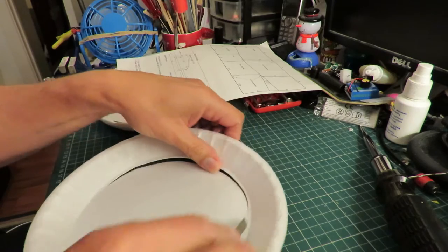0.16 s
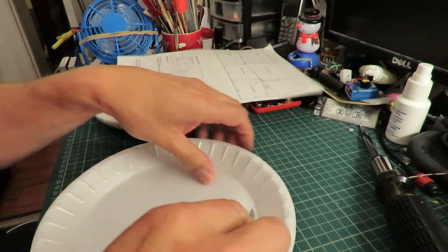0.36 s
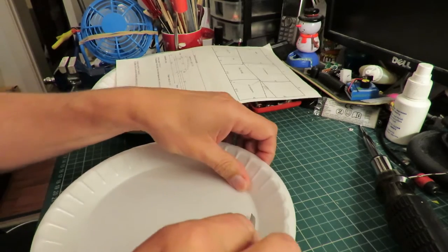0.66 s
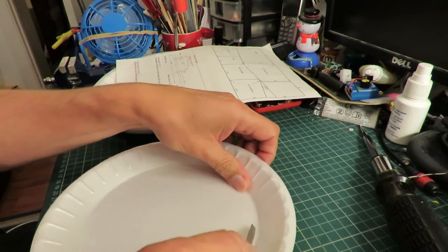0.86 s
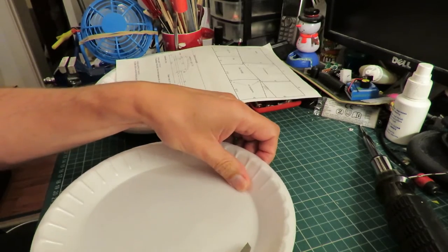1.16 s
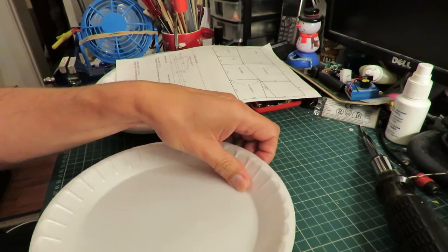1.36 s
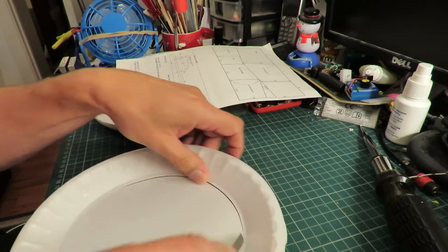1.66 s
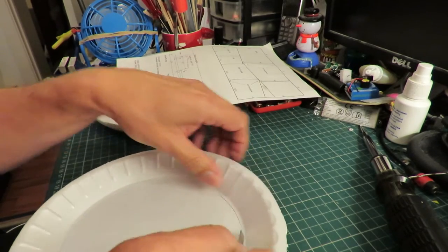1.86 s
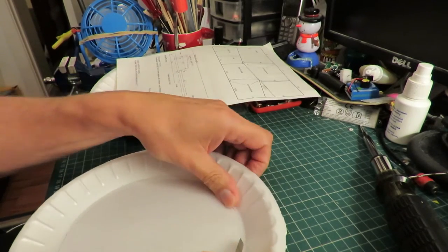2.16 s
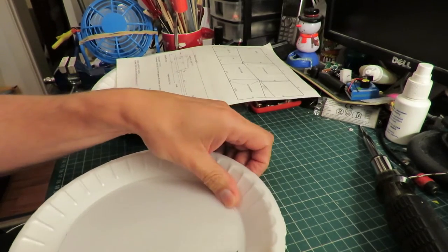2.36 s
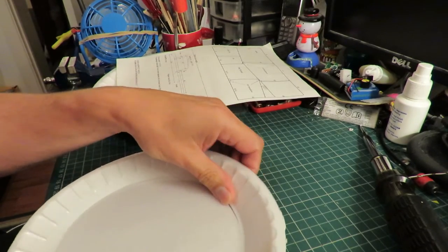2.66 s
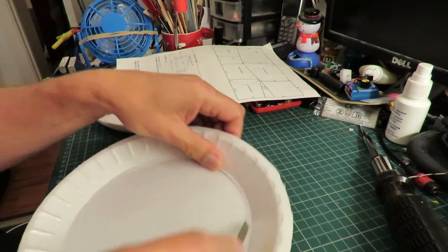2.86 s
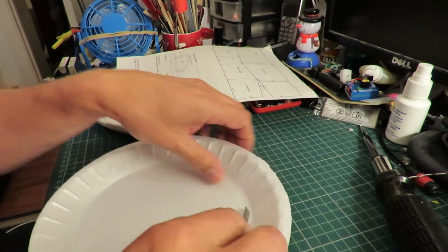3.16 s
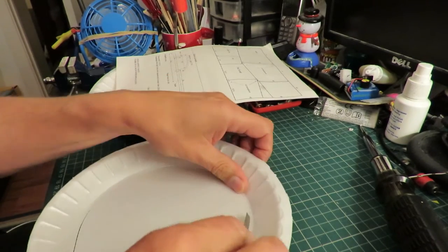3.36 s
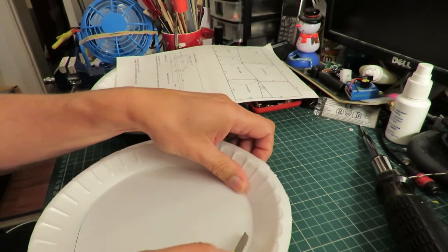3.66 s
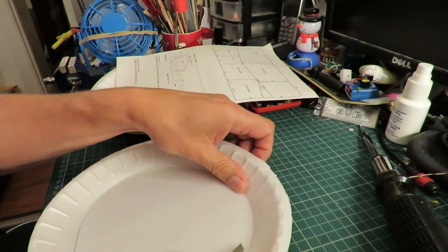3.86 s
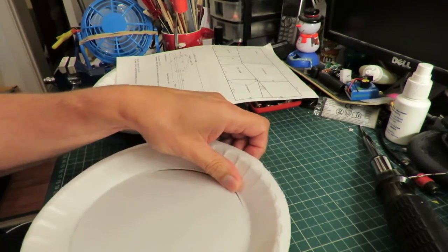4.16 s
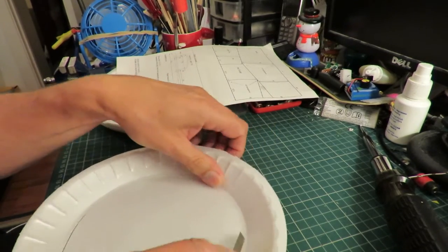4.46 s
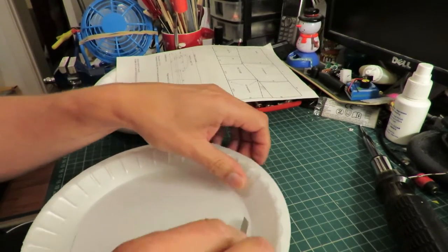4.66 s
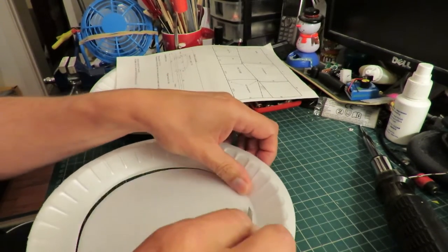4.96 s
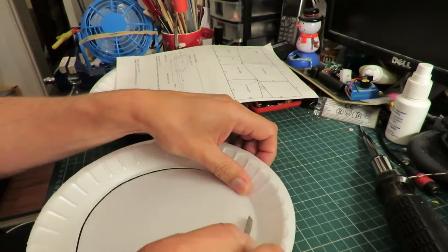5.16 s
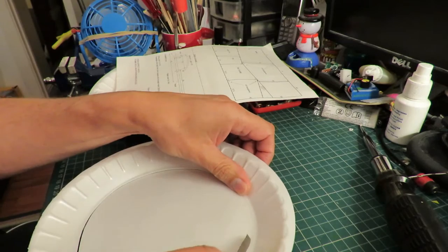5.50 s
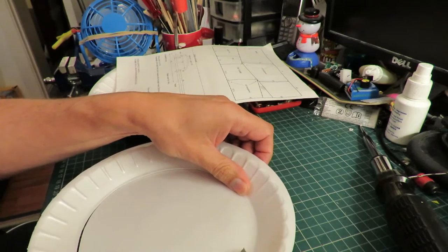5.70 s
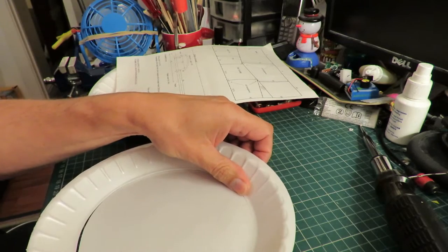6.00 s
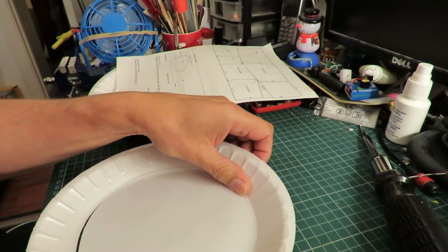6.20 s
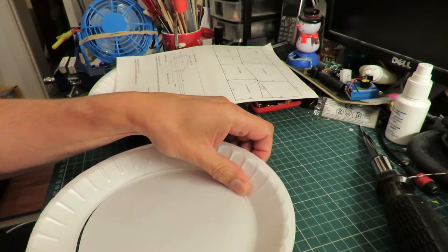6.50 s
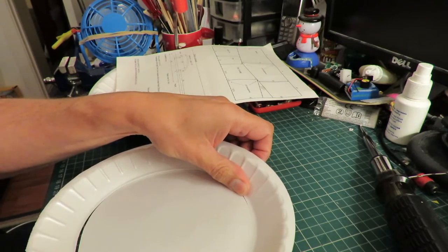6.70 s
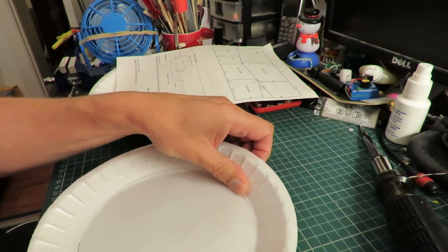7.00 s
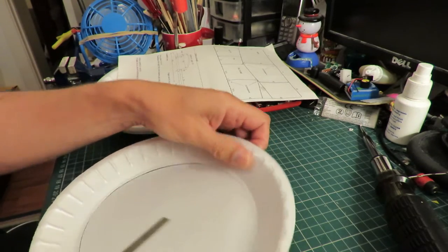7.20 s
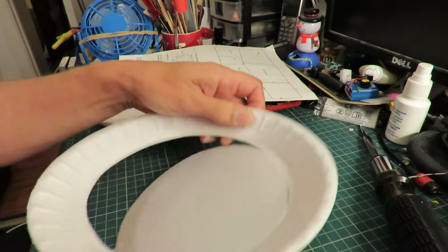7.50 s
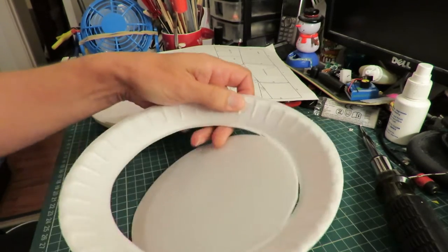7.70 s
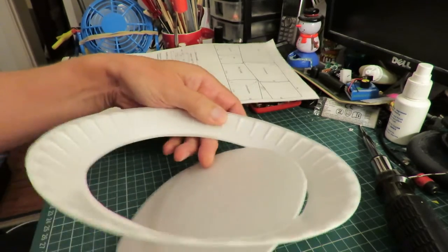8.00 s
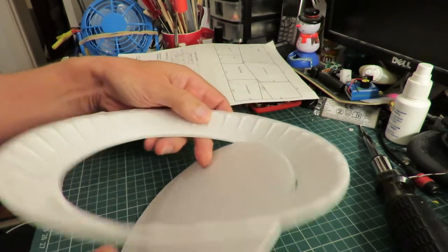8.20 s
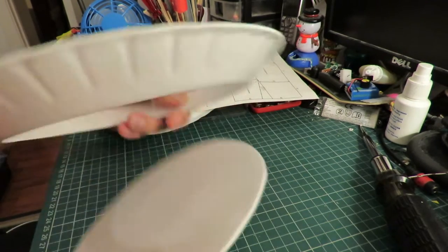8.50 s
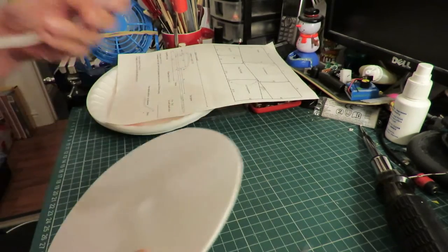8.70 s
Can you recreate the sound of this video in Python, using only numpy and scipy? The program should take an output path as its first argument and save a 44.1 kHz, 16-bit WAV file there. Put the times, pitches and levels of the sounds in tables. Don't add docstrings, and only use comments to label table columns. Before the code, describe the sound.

In a small, quiet, nearly dry room, close to the microphone, a foam plate snaps twice and rubs on a desk mat during the first 0.5 s. A knife bites briefly, then scrapes slowly with fine fizzing crackle until 1.5 s, swelling at the end. A hard snap at 1.66 is followed by loose rubbing. A stronger, uneven stroke runs 2.05-2.7, then knocks and dull desk bumps as the plate is shifted. A faint, wavering stroke from 3.3 ends near 4.25 with the loudest, very short pop. After a lull with soft rubs, a light scrape at 4.8 leads into a long grainy cut from 5.05 to 6.9, swelling around 6.3-6.7. Clustered knocks and a low thump follow to 7.1. Quieter creaks and rubs, a knock at 7.77, scattered dry ticks around 8, and a bright clack at 8.55 close it, leaving near silence.

```python
import sys
import numpy as np
from scipy import signal
from scipy.fft import rfft, irfft, next_fast_len
from scipy.io import wavfile
from scipy.ndimage import uniform_filter1d

SR = 44100
rng = np.random.default_rng(int(sys.argv[2]) if len(sys.argv) > 2 else 0)


def generate_wav(signal):
    frames = np.transpose(np.atleast_2d(signal))
    scaled = np.clip(frames, -1, 1) * 32767
    pcm = np.round(scaled).astype(np.int16)
    wavfile.write(sys.argv[1], SR, pcm)


def level_to_linear(level):
    exponent = np.asarray(level, float) / 20
    return 10 ** exponent


N = 390285

# (frequency [Hz], level [dB])
FOAM_BODY = [(290, -51), (500, -11.5), (736, -20), (874, 1), (1590, 4), (2200, -1), (2810, -1),
             (3100, -0.5), (3760, -11), (6500, -11.5), (8450, -19), (14300, -120)]
# (frequency [Hz], level [dB])
CELL_FIZZ = [(500, -56.5), (2350, 0), (4000, -0.5), (4940, -6), (5770, -7), (6500, -14.5), (9920, -8),
             (12400, -12.5), (14200, -18), (15700, -20)]
# (frequency [Hz], level [dB])
DESK_MODES = [(15, -104), (60, -8), (112, -13), (143, -4), (183, -11.5), (269, -0.5), (312, -4.5),
              (406, -2), (507, -6), (661, -8.5), (744, -13), (850, -2.5), (1100, -4), (1870, -120)]
# (time [s], blade drag [dB], fizz of torn cells over drag [dB])
STROKES = [
    [(0.556, -33, -17), (0.585, -29.5, -11.5), (0.624, -34, -12)],
    [(0.645, -41.5, -4), (0.814, -39, -6.5), (0.866, -40.5, -8), (0.96, -34, -4), (1.122, -37, -6.5),
     (1.46, -30.5, -7), (1.52, -45, -10)],
    [(2.052, -29, -15.5), (2.142, -31, -8), (2.194, -38, -11.5), (2.298, -33.5, -8), (2.332, -38, -11.5),
     (2.612, -29, -7.5), (2.694, -38.5, -8), (2.73, -40, -22)],
    [(3.333, -30, -17), (3.431, -37.5, -11.5), (3.465, -33.5, -8.5), (3.595, -43, -8), (3.825, -43, -8),
     (3.917, -36.5, -6.5), (4.067, -43, -4), (4.159, -39.5, -4.5), (4.25, -37, -17)],
    [(4.796, -46, -16), (4.93, -44, -11), (5.01, -47.5, -13), (5.052, -44, -12)],
    [(5.052, -41, -13.5), (5.256, -33, -11), (5.306, -40, -10.5), (5.432, -36.5, -8), (5.614, -40.5, -4),
     (5.66, -36, -7), (6.15, -36.5, -11.5), (6.3, -32.5, -14.5), (6.89, -39, -19)],
]
# (time [s], peak [dB], frequency [Hz], decay t60 [s])
DESK_PUSHES = [(8.549, -41, 148, 0.18), (2.872, -39.5, 800, 0.073), (3.132, -40.5, 304, 0.047),
               (7.9, -40, 200, 0.035), (8.165, -33.5, 497, 0.047), (0.08, -38.5, 419, 0.066),
               (0.504, -42, 126, 0.12), (2.055, -43, 426, 0.13), (2.123, -34.5, 300, 0.043),
               (2.966, -29, 302, 0.041), (2.972, -39.5, 270, 0.13), (0.28, -45, 90, 0.13),
               (0.575, -42.5, 300, .08), (7.78, -43, 170, 0.13), (2.73, -43, 150, 0.087),
               (3.299, -40.5, 145, 0.054), (4.251, -30.5, 308, 0.035), (4.384, -45, 268, 0.097),
               (6.902, -35, 348, 0.19), (6.916, -19, 267, 0.029), (7.685, -37, 403, 0.21),
               (8.032, -44, 292, 0.23), (8.189, -47, 263, 0.096), (8.542, -43.5, 296, 0.17)]


def evened(x):
    return x / np.sqrt(np.mean(x ** 2) + 1e-20)


def read(points, hz):
    f, value = np.transpose(points)
    return np.interp(np.log(hz + 1), np.log(f + 1), value)


def colour(points, size=4096):
    hz = abs(np.fft.fftfreq(size, 1 / SR))
    log_gain = np.log(level_to_linear(np.maximum(read(points, hz), -100)))
    phase = -signal.hilbert(log_gain).imag
    pulse = np.fft.ifft(np.exp(log_gain + 1j * phase)).real[:size // 2]
    return pulse / np.linalg.norm(pulse)


def through(x, pulse):
    return signal.oaconvolve(x, pulse)[:len(x)]


def patchy(x, gain, patch_db, bins, frames):
    z = signal.stft(x, nperseg=1024, noverlap=896)[2]
    patches = rng.standard_normal(z.shape)
    for _ in range(2):
        patches = uniform_filter1d(patches, bins, 0)
        patches = uniform_filter1d(patches, frames, 1)
    z = z * gain * level_to_linear(patch_db * evened(patches))
    return signal.istft(z, nperseg=1024, noverlap=896)[1][:N]


def tearing(per_s, spread_db, flutter_db, flutter_ms):
    sign = rng.choice([-1., 1.], N)
    size = level_to_linear(spread_db * np.minimum(rng.exponential(1, N), 5)) * sign
    bursts = rng.random(N) < per_s / SR
    span = max(int(flutter_ms * SR / 1000), 2)
    flutter = evened(uniform_filter1d(rng.standard_normal(N), span))
    return evened(size * bursts * level_to_linear(flutter_db * flutter))


def held(start, end):
    edge_s = 0.014
    clock = np.arange(N) / SR
    return np.clip(np.minimum(clock - start, end - clock) / edge_s + .5, 0, 1)


def blade_in():
    return sum(held(stroke[0][0], stroke[-1][0]) for stroke in STROKES)


def contact():
    # (start [s], end [s], level at the start [dB], change to the end [dB], fizz over level [dB])
    shifts = [(0.0, 0.046, -38, -1, -2.5), (0.038, 0.101, -31.5, -5.5, -7),
              (0.104, 0.336, -39.5, -9.5, -10), (0.322, 0.491, -31, -9.5, -12),
              (0.502, 0.564, -34, -10, -22), (1.522, 1.649, -39, 3.5, -8.5),
              (1.663, 1.779, -33, -15.5, -10), (1.77, 2.063, -38.5, -17, -13), (2.734, 2.83, -32, -15, -6),
              (2.824, 3.075, -43.5, 3.5, -12.5), (3.112, 3.301, -38, -3, -13.5),
              (4.235, 4.342, -31.5, -15.5, -12.5), (6.895, 6.942, -30.5, -3, -9.5),
              (6.936, 7.054, -39.5, -20, -11), (7.066, 7.5, -46.5, -0.5, -13.5),
              (7.618, 7.791, -44, 6.5, -12.5), (7.82, 8.195, -41.5, 3, -13.5),
              (8.194, 8.604, -46, -3, -10.5), (8.575, 8.69, -44, -20, 1), (4.43, 4.765, -50.5, 1.5, -12),
              (8.708, 8.86, -59, 5, -6)]
    # (time [s], level [dB], fizz over level [dB], length [s])
    rubs = [(7.9, -39, -20, 0.011), (5.046, -36.5, -3.5, .006), (6.969, -37, -9, .005),
            (7.15, -40, -6, .005), (7.212, -42.5, -4.5, 0.011), (3.895, -38, -5, .005),
            (4.178, -35, -20, .008), (8.05, -33.5, -18, 0.011), (0.0817, -23.5, -24, 0.0075),
            (0.442, -37, -10, 0.016), (0.499, -25, -12, 0.0096), (0.288, -37.5, -10.5, 0.087),
            (2.784, -37, -10, .008), (3.378, -54, -20.5, 0.016), (3.691, -37.5, -5, 0.21),
            (4.546, -43.5, -9, 0.12), (3.1, -31.5, -8, 0.014), (4.392, -40, -7.5, 0.089),
            (7.121, -39.5, -4, 0.068), (7.564, -35.5, -19, 0.12), (6.471, -30.5, -16, 0.11),
            (6.734, -29.5, -13.5, 0.19), (7.964, -33, -13, 0.03), (4.705, -46, -9.5, 0.054),
            (4.85, -52, -5, 0.14), (5.175, -35, -25, 0.03), (5.231, -31, -20, .006), (7.536, -39, -9, 0.06),
            (7.378, -33, -18, 0.035), (8.035, -35, -11, 0.059), (8.157, -44, -2, 0.015),
            (8.336, -33, -14, 0.028), (8.492, -37, -14, 0.025), (8.528, -32, 1, 0.002),
            (8.537, -35, 0, .014), (8.57, -32.5, -4.5, .012)]
    clock = np.arange(N) / SR
    parts = [(level_to_linear(-61), -8)]
    for s, drag_db, fizz_db in map(np.transpose, STROKES):
        level = held(s[0], s[-1]) * level_to_linear(np.interp(clock, s, drag_db))
        parts.append((level, np.interp(clock, s, fizz_db)))
    for start, end, db, change_db, fizz_db in shifts:
        level = held(start, end) * level_to_linear(np.interp(clock, [start, end], [db, db + change_db]))
        parts.append((level, fizz_db))
    for s, db, fizz_db, length in rubs:
        parts.append((level_to_linear(db) * np.exp(-(2 * (clock - s) / length) ** 2), fizz_db))
    drag = np.sqrt(sum(level ** 2 for level, _ in parts))
    fizz = np.sqrt(sum((level * level_to_linear(fizz_db)) ** 2 for level, fizz_db in parts))
    return drag, fizz


def plate(drive, broad_db):
    grip_times = [.5, .64, .98, 1.3, 2.05, 2.17, 2.45, 3.3, 3.41, 3.76, 4.0, 4.7, 5.05, 5.55, 5.85, 6.28,
                  6.62]
    # (frequency [Hz], width [Hz], level [dB])
    grip_modes = [
        [(1600, 650, -3), (2200, 220, 5), (3180, 160, 5), (5500, 900, -8)],
        [(1280, 140, 2.5), (1960, 590, 4), (2120, 120, 4.5), (3010, 250, -8), (3480, 150, -5)],
        [(1297, 170, 5), (2135, 190, 7.5), (1800, 550, -2), (2520, 90, 2), (3100, 250, -0.5), (3490, 90, 0)],
        [(1300, 110, 4), (2120, 237, 4.5), (2560, 120, 6), (3090, 160, 2.5), (3740, 90, -2), (2480, 1500, -2)],
        [(1580, 350, -3.5), (2240, 280, 3), (3260, 190, -4.5)],
        [(2055, 710, -1), (3310, 530, -3)],
        [(2040, 620, 2), (2590, 460, -1.5), (3100, 1250, -4.5)],
        [(2190, 230, 9.5), (3150, 180, 2)],
        [(1500, 300, -3.5), (1720, 130, 1.5), (2070, 440, -3), (3194, 160, 0.5)],
        [(1520, 170, 2), (1800, 130, 6.5), (2100, 280, 2), (2970, 460, -9), (4670, 400, -9)],
        [(1630, 630, -5.5), (2120, 230, 1), (2510, 90, -1), (2970, 300, -5), (4600, 400, -9.5)],
        [(1950, 500, -3), (3150, 250, -2.5)],
        [(1860, 630, 2), (3130, 250, 4)],
        [(1540, 170, 1), (1930, 820, -1.5), (3500, 120, -4)],
        [(414, 90, -10), (1420, 390, -2), (2160, 860, -1.5), (2580, 360, -12)],
        [(427, 51, -13), (1090, 190, -0.5), (1467, 110, 6.5), (2180, 850, -2.5), (3080, 230, -3.5)],
        [(985, 120, 3), (1520, 340, 5), (2120, 1020, 1.5)],
    ]
    # (frequency [Hz], width [Hz], level [dB])
    loose_modes = [(1800, 1150, -3.5), (3300, 310, -10), (4340, 740, -19)]
    hz = np.fft.rfftfreq(1024, 1 / SR)
    powers = []
    for modes in [loose_modes] + grip_modes:
        rings = sum(level_to_linear(2 * db) / (1 + (2 * (hz - f) / w) ** 2) ** 2 for f, w, db in modes)
        power = level_to_linear(2 * (broad_db + read(FOAM_BODY, hz))) + rings
        power /= 1 + (320 / (hz + 1)) ** 6
        powers.append(power / power.mean())
    at = np.minimum(np.arange(-(-N // 128) + 1) * 128, N - 1)
    grip = np.searchsorted(grip_times, at / SR) * (blade_in()[at] > 0)
    blended = uniform_filter1d(np.transpose(powers)[:, grip], size=30, axis=1)
    return patchy(drive, np.sqrt(abs(blended)), patch_db=2.0, bins=3, frames=20)


def cutting():
    drag, bright = contact()
    cells = tearing(9000, spread_db=1.5, flutter_db=1.0, flutter_ms=20.0)
    creases = tearing(2500, spread_db=2.4, flutter_db=1.5, flutter_ms=12)
    loose = 0.5 * cells + 0.8 * creases
    inside = blade_in()
    cells = inside * cells + (1 - inside) * loose
    fizz = through(bright * cells, colour(CELL_FIZZ))
    fizz = patchy(fizz, 0.99, patch_db=3.5, bins=3, frames=30)
    return plate(drag * cells, broad_db=-13.5) + fizz


def hands():
    # (time [s], level [dB])
    weight = [(0.0, -54.5), (0.5, -51.5), (0.84, -58), (1.62, -56.5), (2.1, -58), (2.36, -58), (2.95, -58),
              (3.7, -55.5), (4.3, -57.5), (5.47, -59), (6.66, -53.5), (7.6, -59.5), (8.1, -50.5),
              (8.85, -63)]
    deep_cut_db, deep_shift_db = -16, -9
    after_db, after_t60_s = -10, 0.13
    clock = np.arange(N) / SR
    after = 0
    for s, db, *_ in DESK_PUSHES:
        decay = level_to_linear(db + after_db - 60 * abs(clock - s) / after_t60_s)
        after = after + (decay * held(s, s + 1)) ** 2
    level = np.sqrt(level_to_linear(np.interp(clock, *np.transpose(weight))) ** 2 + after)
    rub = tearing(3000, spread_db=1.5, flutter_db=2.5, flutter_ms=42)
    rub = through(rub, colour(DESK_MODES))
    deep = signal.sosfiltfilt(signal.butter(3, 200, fs=SR, output="sos"), rub)
    deep_db = deep_shift_db + (deep_cut_db - deep_shift_db) * uniform_filter1d(blade_in(), size=6000)
    return level * (evened(rub - deep) + level_to_linear(deep_db) * evened(deep))


def snaps():
    # (time [s], peak [dB], ring [Hz], bright crack over peak [dB], decay t60 [s])
    knocks = [(0.031, -9, 1900, -14, 0.03), (0.088, -13.5, 1340, -10.5, 0.084),
              (0.639, -19.5, 1320, -11, 0.074), (1.658, -4, 1900, -19, 0.03),
              (2.052, -18.5, 1720, -8, 0.048), (2.131, -21.5, 3130, -1, 0.33),
              (2.728, -23, 3740, -12, 0.02), (2.729, -21, 1900, -20, 0.022), (2.737, -15, 2120, -23, 0.018),
              (2.872, -22, 1000, -16, 0.06), (2.968, -18, 1500, -22, 0.098),
              (3.071, -13.5, 1800, -16, 0.071), (4.235, -21, 3570, -17, 0.032),
              (4.254, 3.5, 1583, -18.5, 0.014), (4.379, -27, 2850, -28, 0.09),
              (5.059, -27.5, 1980, 2, 0.06), (6.894, -14, 1410, 1, 0.029), (6.918, -11.5, 1040, -30, 0.039),
              (7.059, -8, 2280, -21, 0.041), (7.122, -28, 3500, -16, 0.042), (7.764, -12, 1290, -10, 0.09),
              (7.768, -21, 3200, -20, .06), (7.767, -12.5, 1390, -11, 0.07), (8.502, -18, 1000, -20, 0.07),
              (8.545, -9, 3300, -1, 0.07), (8.546, -14, 4800, -1, 0.05), (8.546, -9, 1000, -12, 0.11),
              (8.713, -31.5, 1810, -12, 0.07), (0.033, -8, 1150, -25, 0.05), (1.66, -8, 1250, -25, 0.05),
              (2.738, -22, 3920, -20, 0.037), (2.875, -18.5, 1900, -11, 0.061),
              (3.075, -19.5, 3180, -18, 0.064), (4.256, -8, 1150, -12, 0.03),
              (4.255, -16, 4100, -20, 0.032), (7.066, -20, 2600, -20, 0.06), (6.896, -17, 1400, -20, 0.06),
              (0.561, -28, 2200, -12, 0.05), ]
    t = np.arange(5000) / SR
    short = t[:600]
    rattle, chance = rng.standard_normal((40, len(t))), rng.random(size=40)
    spot, wide, crack = np.zeros((3, N + len(t)))
    for (s, db, hz, crack_db, t60), noise, luck in zip(knocks, rattle, chance):
        start = round(s * SR)
        at = slice(start, start + len(t))
        t60 = max(t60, .01)
        blow = 0.2 * noise * level_to_linear(-60 * t / t60)
        blow[0] += 3.0
        blow[round((2.5 + round(luck)) * SR / hz)] -= 1.4
        ring = (1 - np.exp(-short / 0.00031)) * np.exp(-np.pi * 600 * short)
        ring = ring * np.sin(2 * np.pi * hz * short)
        spot[at] += level_to_linear(db) * through(blow, ring / np.linalg.norm(ring))
        small = signal.butter(2, 0.6 * hz, "high", fs=SR, output="sos")
        rounded = uniform_filter1d(blow, size=4, origin=-2)
        wide[at] += level_to_linear(db + 9.5) * signal.sosfilt(small, rounded)
        burst = 0.79 * np.exp(-t / 0.002) * (1 - np.exp(-t / 0.00028))
        crack[at] += level_to_linear(db + crack_db) * noise * (burst + 0.38 * level_to_linear(-70 * t / t60))
    light = signal.butter(3, 750, "high", fs=SR, output="sos")
    body = level_to_linear(1.5) * spot[:N] + level_to_linear(-5) * through(wide[:N], colour(FOAM_BODY))
    return signal.sosfilt(light, body) + level_to_linear(-6.0) * through(crack[:N], colour(CELL_FIZZ))


def thumps():
    t = np.arange(9000) / SR
    tone, puff = np.zeros((2, N + len(t)))
    sagging = t + 0.00083 * (1 - np.exp(-t / 0.026))
    for (s, db, hz, t60), noise in zip(DESK_PUSHES, rng.standard_normal((len(DESK_PUSHES), len(t)))):
        start = round(s * SR)
        at = slice(start, start + len(t))
        shape = level_to_linear(db - 60 * t / t60) * (1 - np.exp(-t / 0.0023))
        tone[at] += shape * np.sin(2 * np.pi * hz * sagging)
        puff[at] += shape * noise
    dull = signal.sosfilt(signal.butter(2, 500, fs=SR, output="sos"), puff[:N])
    both = level_to_linear(2.5) * tone[:N] + level_to_linear(1.5) * through(dull, colour(DESK_MODES))
    return signal.sosfilt(signal.butter(2, 110, "high", fs=SR, output="sos"), both)


def ticks():
    # (time [s], peak [dB], ring [Hz])
    creases = [(0.497, -23, 2100), (0.45, -23, 1970), (0.338, -29, 1800), (0.373, -27, 1700),
               (0.386, -26, 2000), (2.78, -31, 1900), (1.59, -18, 2160), (1.62, -33, 1730),
               (1.711, -20.5, 1780), (8.055, -24, 1500), (7.571, -20.5, 1560), (7.558, -21, 1960),
               (7.096, -25, 2010), (2.107, -24, 2100), (2.154, -15, 3330), (2.712, -26.5, 1720),
               (3.136, -27, 1000), (3.333, -32, 2150), (4.352, -30, 1860), (5.129, -31, 1860),
               (6.61, -29, 1470), (6.86, -23, 1550), (0.15, -23, 2200), (7.21, -39, 1410),
               (7.376, -33, 1950), (7.518, -33, 1700), (7.937, -19.5, 1510), (7.953, -17, 2160),
               (7.966, -25, 1800), (7.985, -24, 1620), (8.044, -23, 1300), (8.786, -41, 1800),
               (8.126, -25, 1810), (8.142, -20, 1660), (8.224, -29, 1900), (8.265, -27.5, 1890),
               (8.33, -24, 1030)]
    t = np.arange(500) / SR
    out = np.zeros(N + len(t))
    for (s, db, hz), noise in zip(creases, rng.standard_normal((len(creases), len(t)))):
        ring = np.exp(-t / 0.0013) * np.sin(2 * np.pi * hz * t)
        edge = .5 * noise * np.exp(-t / 0.00093)
        out[round(s * SR):][:len(t)] += level_to_linear(db) * (ring + edge)
    return through(out[:N], colour(FOAM_BODY)) * level_to_linear(-6.5)


def room(x, t60):
    t = np.arange(9000) / SR
    sign = rng.choice([-1., 1.], len(t))
    sparse = (rng.random(len(t)) < .05) * (t > .004)
    taps = sign * sparse * level_to_linear(-60 * t / t60)
    return through(x, taps / np.linalg.norm(taps))


def ports(x):
    # (frequency [Hz], side relative to mid [dB])
    side_width = [(60, -16), (110, -17), (200, -6), (380, -11), (700, -9), (1290, -15.5), (2380, -13.5),
                  (4400, -10), (8120, -3.5), (15000, 2.5)]
    t, size = np.arange(4096) / SR, next_fast_len(N + 8192)
    hz = np.fft.rfftfreq(size, 1 / SR)
    scattered = np.angle(rfft(rng.standard_normal(len(t)) * np.exp(-t / 0.02), size))
    bass = 1.55 * np.exp(1.45j) + 1.1 * np.exp(-2j * np.pi * hz * .05)
    turn = np.where(hz < 600, bass, np.exp(1j * scattered))
    side = irfft(rfft(x, size) * turn * level_to_linear(read(side_width, hz)), size)[:N]
    return np.array([level_to_linear(1.21) * x + side, level_to_linear(0.86) * x - side])


def scene():
    # (frequency [Hz], level [dB])
    air = [(24, -77), (40, -37), (443, -8.5), (612, -8.5), (710, -15), (784, -11), (1030, -11.5),
           (15000, -62)]
    foam = cutting() + hands() + snaps() + thumps() + ticks()
    hush = level_to_linear(-65) * through(rng.standard_normal(N), colour(air))
    return ports(foam + level_to_linear(-9.0) * room(foam, t60=0.064) + hush)


def top_cut(x):
    return signal.sosfilt(signal.butter(12, 15820, fs=SR, output="sos"), x)


def record(dry):
    cut = signal.sosfilt(signal.butter(2, 45, "high", fs=SR, output="sos"), dry)
    edge = signal.firwin(255, 15800, fs=SR)[None]
    mix = signal.oaconvolve(np.clip(cut, -1, 1), edge, "same")
    return top_cut(mix)


dry = scene()
out = record(dry)
generate_wav(out)
```